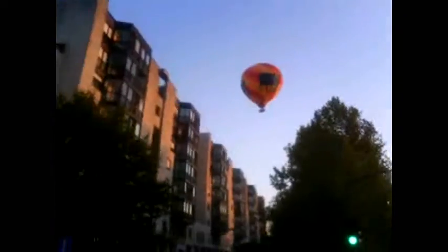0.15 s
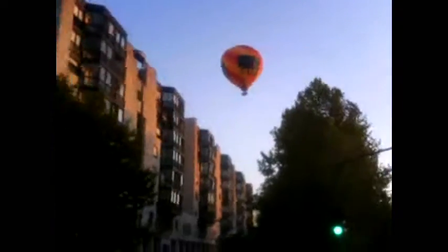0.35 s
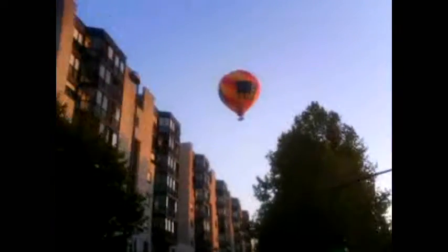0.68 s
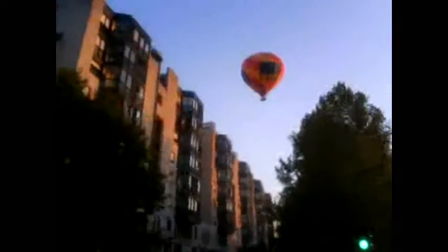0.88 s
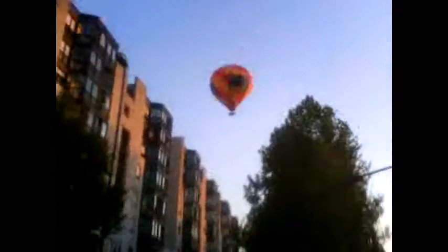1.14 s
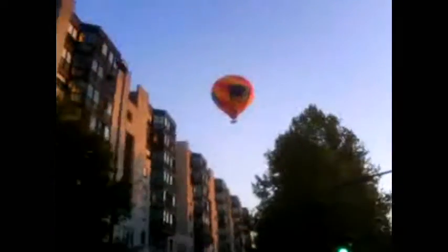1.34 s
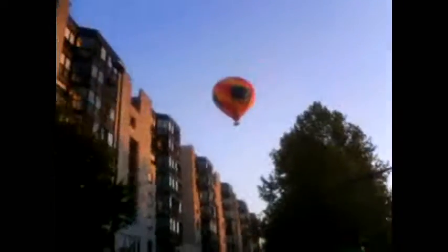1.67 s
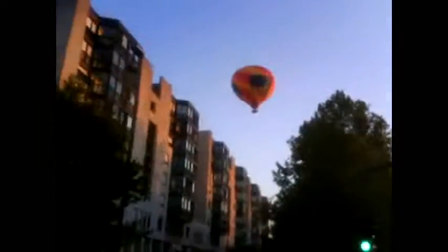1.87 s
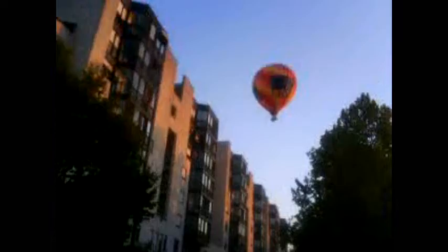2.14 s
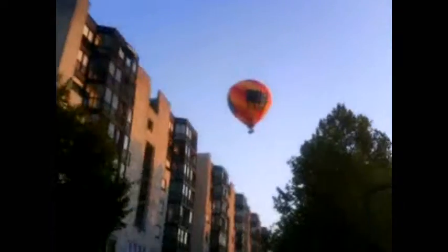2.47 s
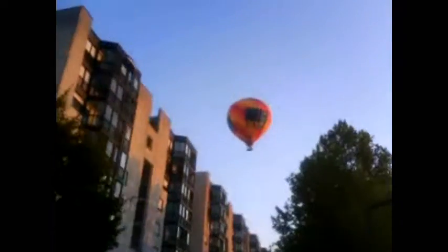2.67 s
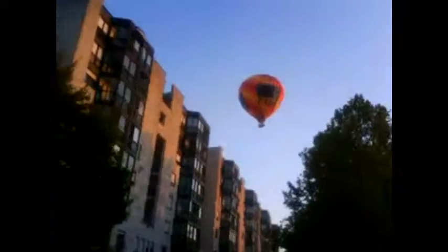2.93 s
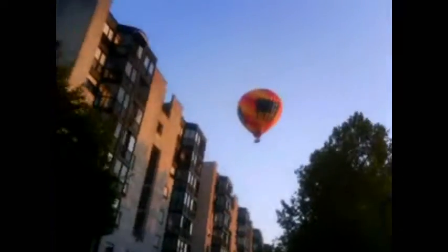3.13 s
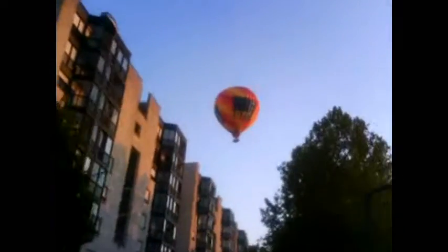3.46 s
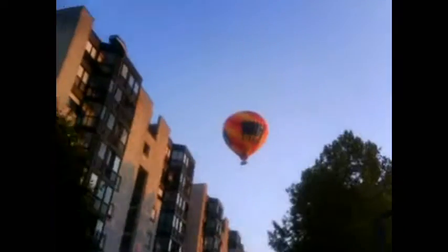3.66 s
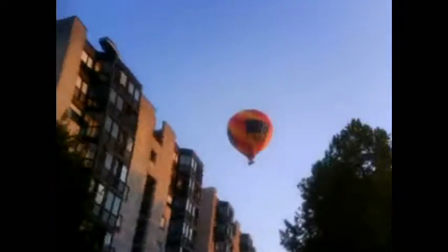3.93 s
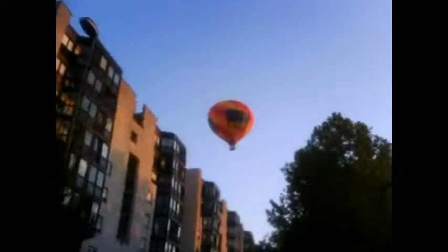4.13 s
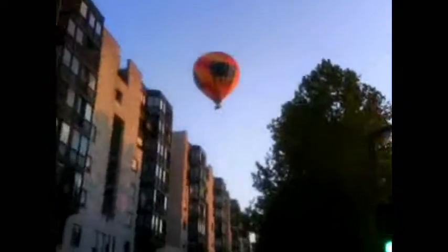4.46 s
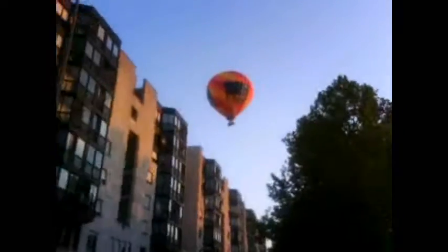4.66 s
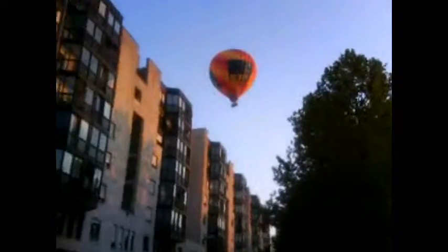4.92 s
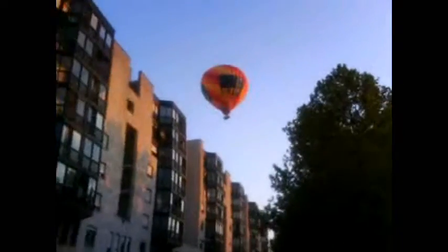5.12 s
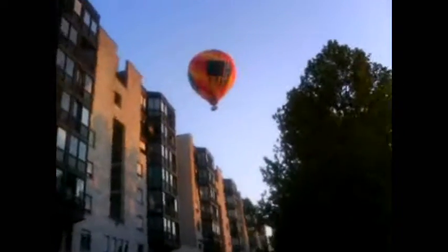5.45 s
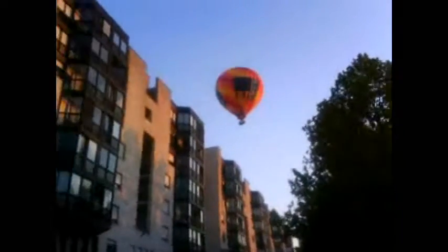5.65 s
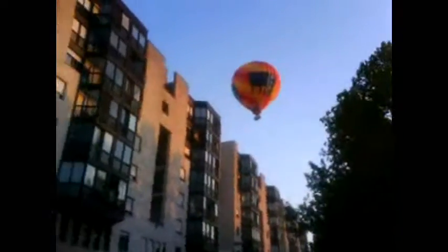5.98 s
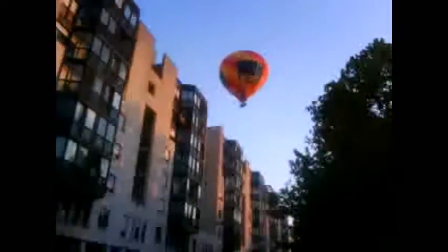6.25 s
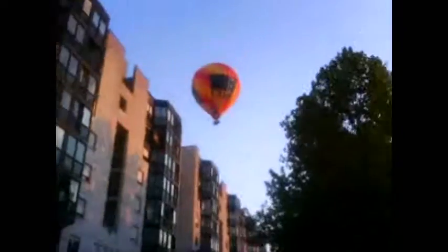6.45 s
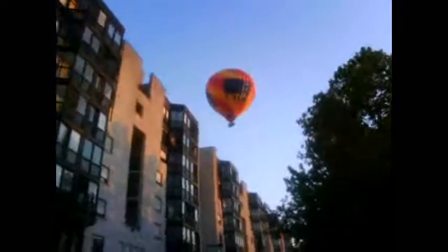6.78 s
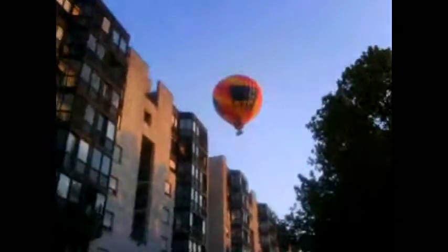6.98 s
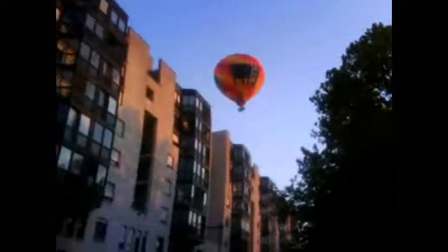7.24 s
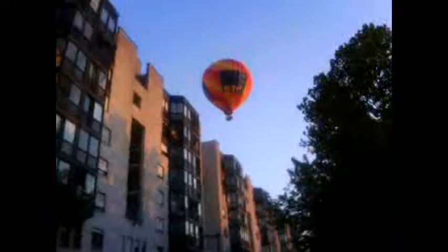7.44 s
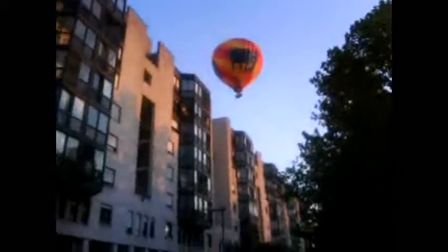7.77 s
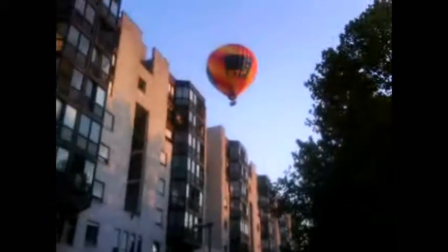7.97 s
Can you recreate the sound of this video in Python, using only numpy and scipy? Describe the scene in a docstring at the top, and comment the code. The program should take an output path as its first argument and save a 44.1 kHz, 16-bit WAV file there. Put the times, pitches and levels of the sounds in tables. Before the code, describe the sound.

Outdoors between apartment blocks, a balloon's gas burner fires without a break: a low turbulent roar with a broad rush and higher hiss, billowing and dipping unevenly. Faint airy whistles drift through it. Low street rumble and engine drones sit beneath. Fingers tick sharply on the handheld camera, mainly around two seconds, again near four and seven. The sound is narrow, dull on top and compressed.

```python
"""A street between apartment blocks, with a hot air balloon's burner firing above it in one long rush.
The flame roars and its gas jet rushes and hisses: turbulent noise, the rush and hiss louder as the roar lulls.
Gliding narrow bands of noise make breathy whistles; low noise, harmonic engine drones and thin hums fill the street.
Fingers tick and rub on the hand-held camera as filtered impulses. Its peak limiter ducks the whole sound
for a moment after a sharp peak, within a narrow band that ends in a converter and its filter."""
import sys
import numpy as np
from scipy import signal
from scipy.fft import rfft, irfft, next_fast_len
from scipy.io import wavfile
from scipy.ndimage import uniform_filter1d, minimum_filter1d

SR = 44100
rng = np.random.default_rng(int(sys.argv[2]) if len(sys.argv) > 2 else 0)


def persist_wave(psi):
    """Save psi, clipped to +-1, as 16-bit WAV."""
    counts = np.round(np.clip(psi, -1, 1) * 32767).astype(np.int16)
    wavfile.write(sys.argv[1], SR, np.atleast_2d(counts).T)


N = 357233
T = np.arange(N) / SR  # time in seconds


def gain_of(db):
    """Level definition: decibels to an amplitude ratio."""
    return 10 ** (np.asarray(db) / 20)


def evened(x):
    """Power normalisation: scales to an rms of one."""
    return x / np.sqrt(np.mean(x ** 2) + 1e-20)


def curve(rows, t, order=1):
    """Linear interpolation in time of one column of a table."""
    rows = np.array(rows)
    return np.interp(t, rows[:, 0], rows[:, order])


def bumps(rows):
    """Superposition of level swings in dB: each row is one smooth cosine-squared rise or dip."""
    swing_db = np.zeros(N)
    for middle, length, db in rows:
        swing_db += db * np.cos(np.pi * np.clip((T - middle) / length, -.5, .5)) ** 2
    return swing_db


def read(points, hz):
    """Spectral interpolation: levels in dB, joined on a log-frequency axis."""
    f, db = np.transpose(points)
    return np.interp(np.log(hz + 1), np.log(f + 1), db)


def turbulence(colour, patchy_db, size=1024, eddy_size=11):
    """Turbulent noise: random spectra shaped by colour(s, Hz), with patches lifted and dropped by eddies."""
    hop = size // 4
    t = np.arange(N // hop + 5)[:, None] * hop / SR
    hz = np.fft.rfftfreq(size, 1 / SR)
    real, imag, eddies = rng.standard_normal((3, len(t), len(hz)))
    # smoothing over time, then over frequency, makes the patches
    eddies = uniform_filter1d(eddies, size=eddy_size, axis=0)
    eddies = evened(uniform_filter1d(eddies, size=eddy_size, axis=1))
    shape = gain_of(colour(t, hz))
    # a change of colour alone leaves the power of a frame as it was
    shape = shape / np.linalg.norm(shape, axis=-1, keepdims=True)
    spectra = (real + 1j * imag) * shape * gain_of(patchy_db * eddies)
    noise = signal.istft(spectra.T, nperseg=size, noverlap=size - hop)[1]
    return evened(noise[:N])


def band_pass(x, low_hz, high_hz):
    """Band-pass filtering: keeps what lies between two edges."""
    edges = np.clip([low_hz, high_hz], 1, SR / 4)
    return signal.sosfilt(signal.butter(4, edges, "band", fs=SR, output="sos"), x)


def flutter(rate_hz):
    """Random modulation: a wobble of unit rms whose spectrum dies away beyond the given rate."""
    size = next_fast_len(N, True)
    hz = np.fft.rfftfreq(size, 1 / SR)
    spectrum = rfft(rng.standard_normal(size)) * np.exp(-(hz / rate_hz) ** 2)
    return evened(irfft(spectrum, size)[:N])


# Level of the street's low rumble. Each row: time in seconds, level in dB.
RUMBLE_LEVEL = [(0, -11), (.6, -16.5), (1.6, -15.5), (1.9, -23), (2.25, -20.5), (2.55, -24), (2.9, -25.5),
                (3.7, -21.5), (4.9, -17.5), (5.12, -32), (5.28, -14.5), (5.6, -28), (5.85, -20.5),
                (6.3, -19), (6.65, -24.5), (6.95, -19.5), (7.3, -20.5), (8.1, -22.5)]
# Spectrum of the rumble. Each row: frequency in Hz, relative density in dB per Hz.
RUMBLE_SPECTRUM = [(10, -24), (25, -11.5), (45, -9.5), (65, -1.5), (95, -3.5), (125, -3.5), (170, -9.5),
                   (400, -45.5)]


def rumble():
    """Broadband noise: the street's low rumble, of fixed colour and drifting level."""
    noise = turbulence(lambda t, hz: read(RUMBLE_SPECTRUM, hz), patchy_db=1.4, size=4096)
    return noise * gain_of(curve(RUMBLE_LEVEL, T))


# Engines in the street. Each row: start in seconds, end in seconds, firing rate at the start in Hz,
# climb in Hz per s, level of the fundamental at the start in dB, swell in dB per s,
# level of each of two overtones against the fundamental in dB.
ENGINE_DRONES = [(0.478, 1.049, 114.5, -4.5, -14.5, -6, -8), (2.529, 4.352, 64.9, 12.5, -13, -5.5, -10),
                 (4.2, 4.907, 64.4, 2, -19, 1, -10.5), (5.607, 8.397, 69.53, 0.57, -37.5, 6.5, 0)]
ENGINE_FADE_S = 0.34  # fade in and out


def engines():
    """Harmonic series: exhaust pulses sound as a slightly uneven firing rate and two overtones."""
    out = np.zeros(N)
    for start, end, hz, climb, db, swell, overtones_db in ENGINE_DRONES:
        age = np.clip(T, start, end) - start
        pitch = (hz + climb * age) * (1 + .012 * flutter(rate_hz=11))
        turns = np.cumsum(pitch) / SR
        note = np.zeros(N)
        for harmonic, level_db in enumerate((0, overtones_db, overtones_db), start=1):
            note += gain_of(level_db) * np.sin(2 * np.pi * harmonic * turns)
        fade = np.clip(np.minimum(T - start, end - T) / ENGINE_FADE_S, 0, 1)
        level = gain_of(db + swell * age + 1.0 * flutter(rate_hz=11))
        out += np.sqrt(2) * note * fade * level
    return out


# Faint clear hums in the street. Each row: start in seconds, end in seconds, pitch at the start in Hz,
# climb in Hz per s, rms level at the middle in dB.
STREET_HUMS = [(0.926, 1.398, 524, 17, -24.5), (1.121, 1.78, 466.6, 110, -26), (1.716, 1.916, 467, 1, -28)]
HUM_WAVER = 0.0048  # rms share of the pitch


def hums():
    """Frequency modulation: thin pure tones swell, glide up and fade, wavering a little."""
    out = np.zeros(N)
    for start, end, hz, climb, db in STREET_HUMS:
        age = np.clip(T, start, end) - start
        pitch = (hz + climb * age) * (1 + HUM_WAVER * flutter(rate_hz=10.3))
        tone = np.sin(2 * np.pi * np.cumsum(pitch) / SR)
        swell = np.sqrt(2 * abs(np.sin(np.pi * age / (end - start))))
        out += gain_of(db) * tone * swell
    return out


# Fingers rubbing the camera. Each row: start in seconds, length in seconds, level at the middle in dB.
FINGER_RUBS = [(1.87, 0.034, -20), (1.905, 0.026, -18)]
SLIPS_PER_S = 2100


def rubs():
    """Stick-slip friction: a finger shifts its grip, and tiny slips of uneven size rattle the shell."""
    slips = rng.standard_normal(N) * (rng.random(N) < SLIPS_PER_S / SR)
    rattle = evened(band_pass(slips, low_hz=2200, high_hz=5200))
    press = np.zeros(N)
    for start, length, db in FINGER_RUBS:
        press += gain_of(db) * np.sin(np.pi * np.clip((T - start) / length, 0, 1))
    return rattle * press


# Finger ticks on the camera. Each row: start in seconds, peak level in dB, low edge in Hz,
# high edge in Hz, decay time of the grit in seconds.
FINGER_TICKS = [(1.7190, -3, 1900, 4200, 0.00079), (1.7224, 6, 1300, 4480, .0004),
                (1.8683, 13.5, 1800, 4760, 0.00021), (1.8875, 1, 1000, 3600, .0016),
                (1.9037, 10.5, 2200, 5400, 0.00066), (1.926, 3.5, 80, 1100, 0.00022),
                (2.411, -1, 2300, 4670, .0008), (2.428, 5, 150, 600, 0.00073),
                (2.461, -6, 1400, 4000, .0006), (2.519, 2, 2400, 5400, .0009),
                (3.4295, -0.5, 2000, 5140, 0.00046), (4.0322, 3, 700, 4880, .001),
                (4.1549, 9.5, 1210, 4940, .001), (4.2015, -3, 1400, 4200, .0018),
                (7.0235, 8, 79.5, 890, .0003), (7.1516, -8, 120, 550, 0.00044)]
TICK_GRIT = 0.22  # size of the grit against the first push


def ticks():
    """Impulse excitation: one sharp push on the shell and a brief decaying spray of grit, in a broad band."""
    out = np.zeros(N)
    t = np.arange(SR // 50) / SR
    for start, db, low_hz, high_hz, decay in FINGER_TICKS:
        push = t == 0
        grit = TICK_GRIT * rng.standard_normal(len(t)) * np.exp(-t / decay)
        snap = band_pass(push + grit, low_hz, high_hz)
        out[round(start * SR):][:len(t)] += gain_of(db) * snap / abs(snap).max()
    return out


# Breathy whistles and moans in the rush. Each row: start in seconds, length in seconds,
# pitch at the middle in Hz, glide in Hz per s, bandwidth in Hz, level at the middle in dB.
BREATHY_WHISTLES = [(0, 1.95, 932, 30, 177, -23), (0.945, 0.706, 601, 10, 301, -19.5),
                    (1.053, 0.71, 6580, -0.5, 800, -37.5), (1.62, 0.35, 5070, 0, 900, -34),
                    (2.051, 1.3, 933, 40, 300, -25.5), (3.553, 1.1, 3490, 1.5, 380, -25.5),
                    (3.552, 0.69, 5600, 99.5, 595, -37.5), (4.197, 0.4, 2820, 49, 130, -23),
                    (4.201, 0.95, 6000, -450, 560, -37.5), (4.573, 0.56, 269, 3.5, 35, -19.5),
                    (5.476, .44, 276.8, -40, 69.4, -14), (5.299, 2.8, 2139, 20.5, 230, -23),
                    (5.999, 1.83, 470.2, 10, 280, -19.5), (6.035, 0.46, 310.7, -120, 110, -16.5),
                    (6.001, 2.4, 2696, 40, 230, -28), (6.097, 2.1, 3554, 58.5, 982, -30.5),
                    (6.907, 1.54, 4370, 355, 400, -34), (7.737, .6, 2300, 150.5, 170, -21),
                    (7.764, 0.74, 2760, 198.5, 298, -23)]
WHISTLE_WAVER, WHISTLE_FLICKER_DB = .01, 1.26  # rms unsteadiness of pitch (share) and of level


def whistles():
    """Heterodyning: slow noise, turned up to a gliding pitch, swells out of the rush and sinks back."""
    out = np.zeros(N)
    waver, flicker = flutter(rate_hz=6), flutter(rate_hz=6.9)
    for start, length, hz, glide, width, db in BREATHY_WHISTLES:
        through = np.clip((T - start) / length, 0, 1)
        smooth = signal.butter(2, width / 2, fs=SR, output="sos")
        slow_noise = signal.sosfilt(smooth, rng.standard_normal(N) + 1j * rng.standard_normal(N))
        pitch = (hz + glide * length * (through - .5)) * (1 + WHISTLE_WAVER * waver)
        carrier = np.exp(2j * np.pi * np.cumsum(pitch) / SR)
        breath = evened((slow_noise * carrier).real)
        swell = abs(np.sin(np.pi * through)) ** 0.34
        out += gain_of(db + WHISTLE_FLICKER_DB * flicker) * breath * swell
    return out


# Slow drift of the burner, before its quicker swings. Each row: time in seconds, low roar level in dB,
# rush level in dB, jet hiss level in dB.
FLAME_LEVELS = [(0, -19, -16, -25.5), (.35, -7.5, -17, -24.5), (.9, -16, -18, -21.5),
                (1.35, -12.5, -15, -19), (1.8, -19.5, -16, -25), (2.2, -14, -16, -18),
                (2.7, -10, -15.5, -21.5), (2.95, -11.5, -16, -23), (3.5, -12, -15.5, -20),
                (4.05, -14, -16.5, -16.5), (4.45, -18, -13, -20.5), (4.8, -15, -13.5, -31),
                (5.35, -12, -14, -21.5), (5.75, -12, -15, -18.5), (6.2, -8.5, -16.5, -24),
                (6.9, -11, -17.5, -24), (7.6, -11, -19.5, -25.5), (8.1, -14.5, -19, -17.5)]
# Pitch of the roar. Each row: time in seconds, factor on the frequencies of its spectrum.
ROAR_PITCH_FACTOR = [(0, 0.94), (.6, 0.71), (1.1, 0.62), (1.6, 0.52), (2.15, 0.88), (2.5, 1.08),
                     (2.95, 0.88), (3.55, 0.96), (5.1, 1.03), (5.3, 0.77), (5.55, 0.97), (5.85, 1.09),
                     (6.1, 1.14), (6.7, 1.1), (7.25, 0.92), (7.55, 1.19), (8.1, 0.88)]
# Spectrum of the roar at factor one. Each row: frequency in Hz, relative density in dB per Hz.
ROAR_SPECTRUM = [(60, -27), (110, -7.5), (160, -1.5), (260, 1), (340, -1), (450, -7), (600, -13.5),
                 (900, -36), (2000, -52.5)]


def flame_roar(swing_db):
    """Combustion noise: low turbulent noise whose level billows and whose spectrum slides in pitch."""
    roar = turbulence(lambda t, hz: read(ROAR_SPECTRUM, hz / curve(ROAR_PITCH_FACTOR, t)),
                      patchy_db=2.5, size=2048, eddy_size=4)
    return roar * gain_of(curve(FLAME_LEVELS, T, order=1) + swing_db + 1.84 * flutter(rate_hz=47))


RUSH_USUAL_DB, RUSH_OCTAVES_PER_DB = -15.5, 0.217


def rush_pitch(t):
    """Spectral scaling: a stronger rush is brighter, its spectrum sliding up from the usual level's place."""
    return 2 ** (RUSH_OCTAVES_PER_DB * (curve(FLAME_LEVELS, t, order=2) - RUSH_USUAL_DB))


# Spectrum of the rush at its usual level. Each row: frequency in Hz, relative density in dB per Hz.
RUSH_SPECTRUM = [(150, -8.5), (350, -2), (520, -2), (700, -0.5), (920, 0), (1300, -2), (1700, -3),
                 (2200, -6.5), (2800, -11.5), (4000, -24), (7000, -40)]
# Spectrum of the hiss. Each row: frequency in Hz, relative density in dB per Hz.
HISS_SPECTRUM = [(1000, -23), (1500, -5), (2000, 2), (2700, 2.5), (3200, -1), (4000, -3), (4600, -8.5),
                 (5500, -13.5), (6200, -19), (6900, -23.5), (7400, -18)]
# The jet surges (+) or slackens (-). Each row: middle in seconds, length in seconds,
# swing of rush and hiss in dB.
JET_SURGES = [(.125, 0.068, 2.5), (.285, .1, 6), (.39, 0.21, -1.5), (1.44, .14, 2), (2.71, .14, 1),
              (4.43, .12, 2), (5.29, 0.18, 2.5), (6.425, .08, 1.5), (6.5, .14, -0.5)]
# rush and hiss are lowered under a billow and raised in a lull, as under gain control (dB per dB of roar)
RUSH_DUCK, HISS_DUCK = 0.28, 0.35


def gas_jet(swing_db):
    """Jet noise: a broad rush and a higher hiss from one jet, so they surge and flicker together."""
    rush = turbulence(lambda t, hz: read(RUSH_SPECTRUM, hz / rush_pitch(t)), patchy_db=0.75)
    rush *= gain_of(curve(FLAME_LEVELS, T, order=2) - RUSH_DUCK * swing_db)
    hiss = turbulence(lambda t, hz: read(HISS_SPECTRUM, hz), patchy_db=1.5)
    hiss *= gain_of(curve(FLAME_LEVELS, T, order=3) - HISS_DUCK * swing_db)
    return (rush + hiss) * gain_of(bumps(JET_SURGES) + 0.7 * flutter(rate_hz=23))


# The roar billows up (+) or falls into a lull (-). Each row: middle in seconds, length in seconds,
# swing of the roar in dB.
ROAR_BILLOWS = [(1.002, 0.071, -15.5), (1.106, 0.1, 6), (1.599, 0.18, 8.5), (1.38, 0.43, -4),
                (1.807, 0.16, -17), (2.133, 0.22, 2.5), (2.39, 0.15, -1.5), (2.55, 0.048, 3.5),
                (2.7, 0.26, -6), (2.84, 0.18, 1.5), (3.528, 0.19, 4), (3.708, 0.16, -6.5), (3.826, 0.26, 6),
                (5.085, 0.23, 6), (5.559, .12, 6.5), (5.737, 0.2, 3), (5.947, 0.21, -9.5), (6.08, .14, 3.5),
                (6.386, 0.23, -6.5), (6.51, 0.28, 4.5), (7.691, 0.08, 2.5), (8.087, 0.13, -4.5)]


def burner():
    """Opposed levels: one set of billows lifts the roar and lowers the rush and hiss, as under gain control."""
    swing_db = bumps(ROAR_BILLOWS)
    return flame_roar(swing_db) + gas_jet(swing_db)


def scene():
    """Superposition: street, handling of the camera and burner add up at one microphone."""
    street = rumble() + engines() + hums()
    handling = rubs() + ticks()
    return (street + handling + whistles() + burner())[None]


EDGE_HZ = 7200  # upper edge of the camera's band
STOP_BAND_DB = -54  # the filter lets a trace through


def band_limit(x):
    """Low-pass filtering: a steep upper edge, with a very low but finite stop band."""
    low_pass = signal.firwin(301, EDGE_HZ, window=("kaiser", 8), fs=SR)
    return signal.oaconvolve(x, low_pass[None], "same") + gain_of(STOP_BAND_DB) * x


def limiter(x, ceiling_db, recovery_db_per_s, linger_share, linger_db_per_s):
    """Peak limiting: gain drops at once on a peak over the ceiling, then climbs back fast, later slowly."""
    over_db = np.maximum(20 * np.log10(abs(x).max(0) + 1e-9) - ceiling_db, 0)
    quick, slow = T * recovery_db_per_s, T * linger_db_per_s
    # each reduction falls along a straight line in dB until a greater one takes over
    quick_db = np.maximum.accumulate(over_db + quick) - quick
    slow_db = np.maximum.accumulate(linger_share * over_db + slow) - slow
    held_db = np.maximum(quick_db, slow_db)
    # the drop is widened and smoothed over a few samples
    gain_db = uniform_filter1d(minimum_filter1d(-held_db, size=15), size=15)
    return x * gain_of(gain_db)


CONVERTER_HZ, MIRROR_FROM_HZ = 16000, 600  # sampling rate; the mids and treble are mirrored


def mirror(x):
    """Spectral imaging: the converter turns the sound upside down below its sampling rate."""
    high_pass = signal.butter(1, MIRROR_FROM_HZ, "high", fs=SR, output="sos")
    thin = signal.sosfilt(high_pass, x)
    analytic = signal.hilbert(thin, next_fast_len(N))[:, :N]
    return (analytic * np.exp(-2j * np.pi * CONVERTER_HZ * T)).real


def record(dry):
    """Signal chain: the camera's narrow band, its peak limiter, then the converter and its filter."""
    limited = limiter(band_limit(dry), ceiling_db=-0.25, recovery_db_per_s=154,
                      linger_share=0.56, linger_db_per_s=48.5)
    return band_limit(limited + mirror(limited))


dry = scene()
out = record(dry)
persist_wave(out)
```